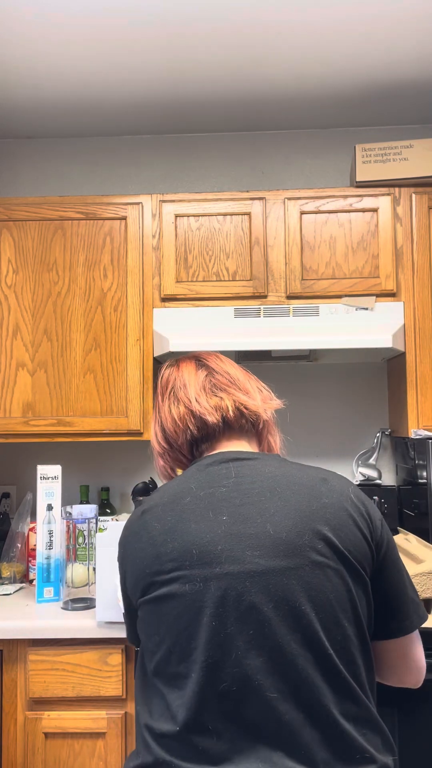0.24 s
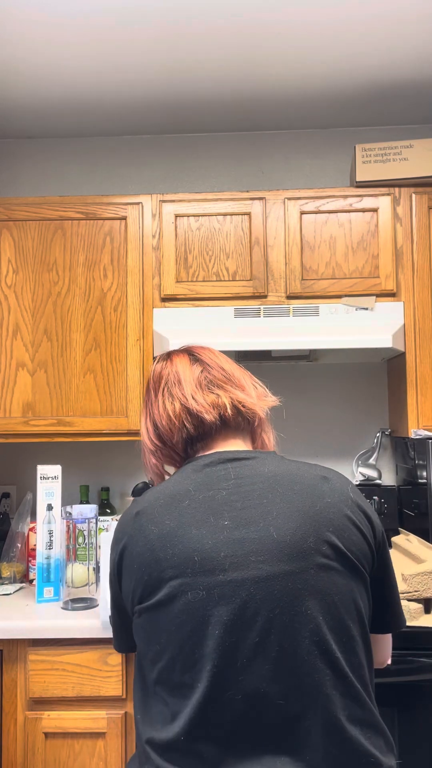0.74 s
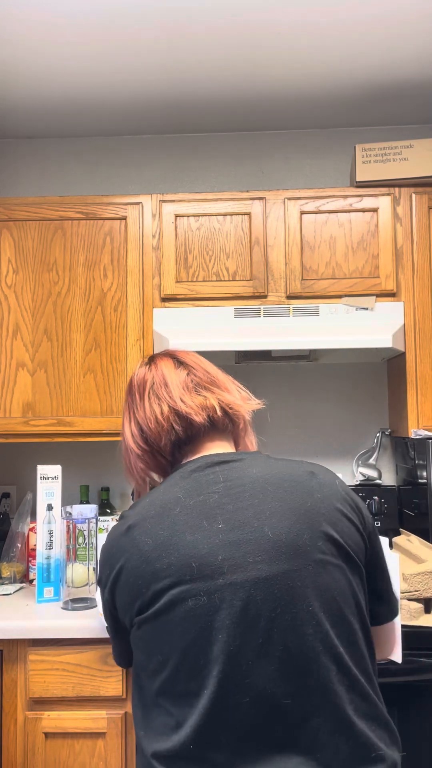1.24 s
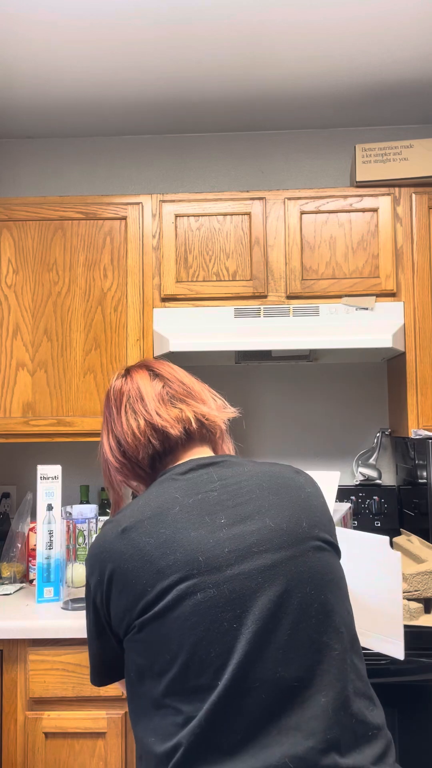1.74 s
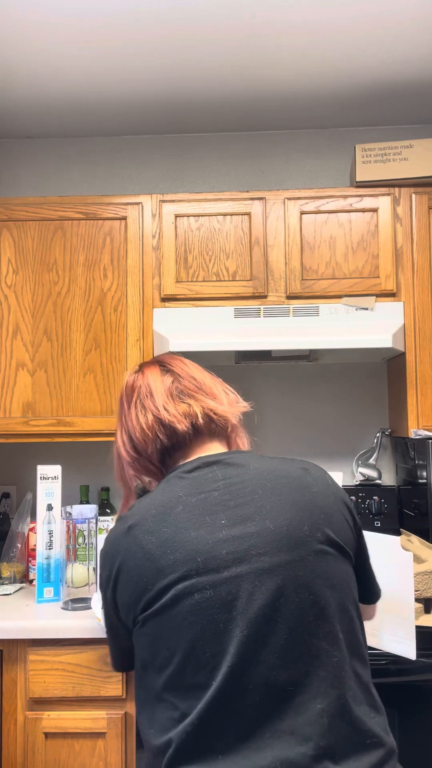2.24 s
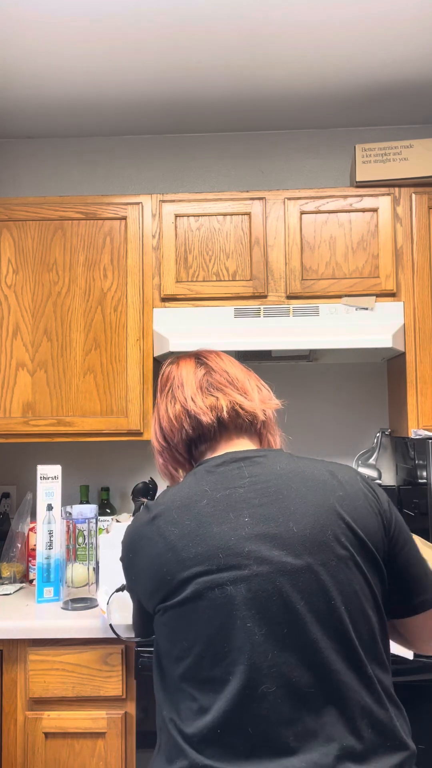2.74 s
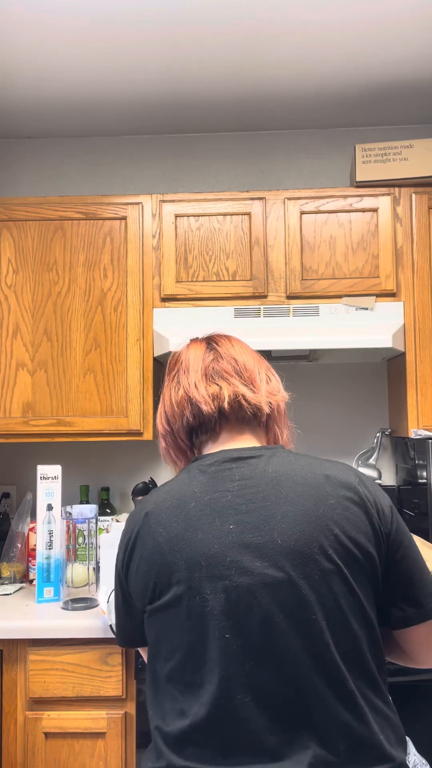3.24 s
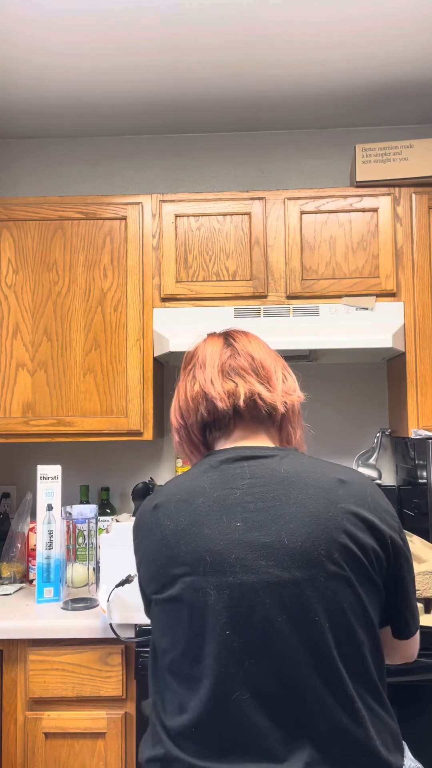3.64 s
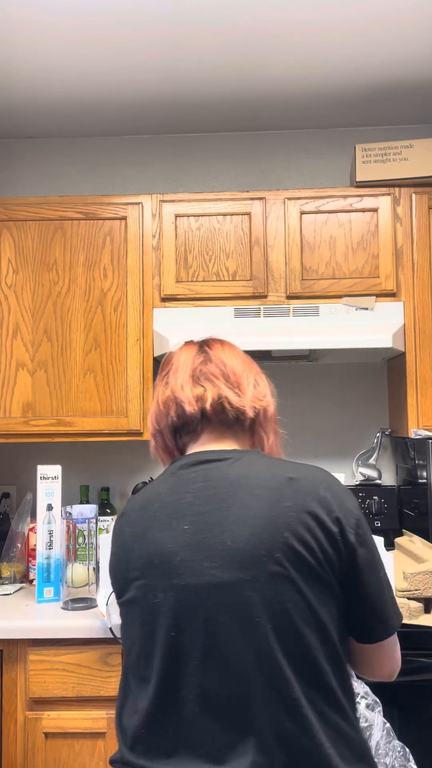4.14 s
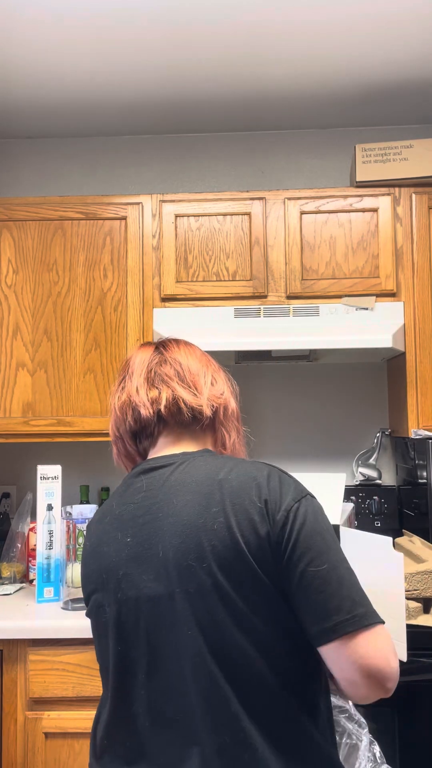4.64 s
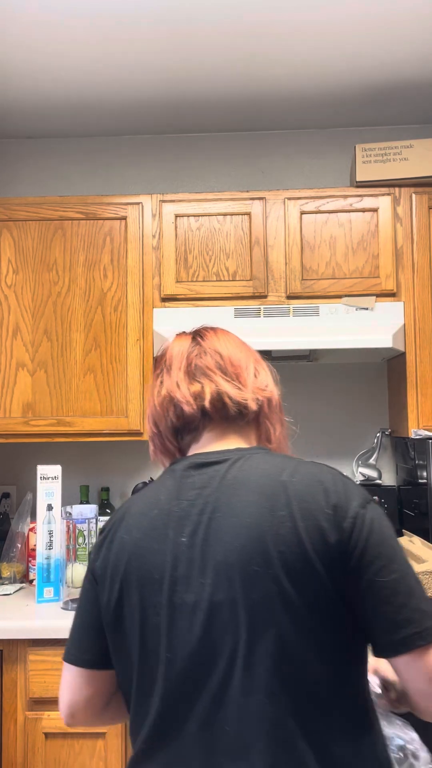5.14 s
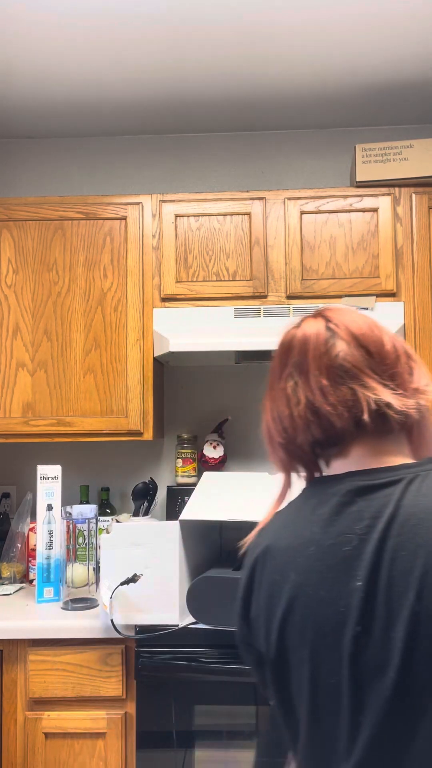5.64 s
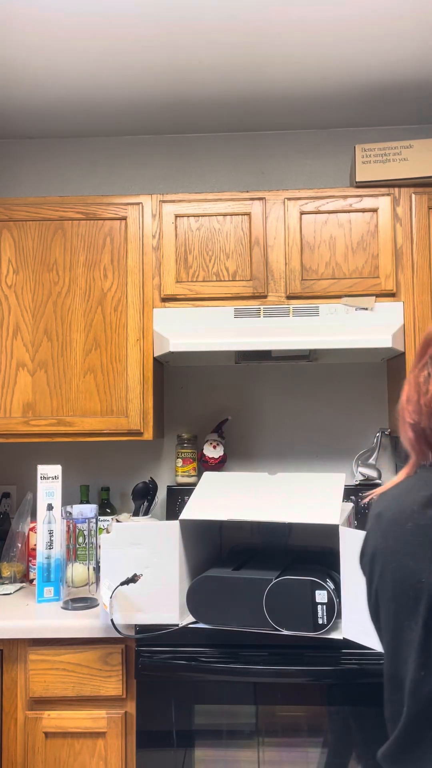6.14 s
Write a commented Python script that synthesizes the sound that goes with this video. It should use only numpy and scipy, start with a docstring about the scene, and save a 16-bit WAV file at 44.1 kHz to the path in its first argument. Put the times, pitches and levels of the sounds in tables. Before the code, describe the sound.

Large cardboard box handled on a kitchen counter: short dry scrapes, crinkly ticks, hollow knocks and soft low thuds over a faint hum.

```python
"""A large cardboard box is opened on a kitchen counter, over a quiet background and a faint hum.
Strokes of filtered stick-slip noise scrape from the start, with noise-burst ticks and flicks as creases and ridges catch.
Knocks ring the box modes, clustering near 1.5 s; the loudest ticks come around 2.4-2.6 s.
From 3.6 to 4.5 s soft sine thuds gather under the strokes; near 5.4 s the knocks cluster again.
Short rubs follow, then a faint last stroke. A phone a few steps behind hears it in stereo."""
import sys
import numpy as np
from scipy import signal
from scipy.fft import rfft, irfft, next_fast_len
from scipy.io import wavfile
from scipy.ndimage import uniform_filter1d, map_coordinates

SR = 44100
rng = np.random.default_rng(int(sys.argv[2]) if len(sys.argv) > 2 else 0)


def wrap_up_sound(samples):
    """Save the sound to the file named by the first command line argument, as 16-bit audio."""
    columns = np.atleast_2d(samples).T
    # keep every value between -1 and 1, then stretch to whole-number steps
    tamed = np.clip(columns, -1, 1)
    steps = np.round(tamed * 32767).astype(np.int16)
    wavfile.write(sys.argv[1], SR, steps)


N = 280899  # samples


def amp(db):
    """Decibels to amplitude gain."""
    return 10 ** (np.asarray(db) / 20)


def unit(x):
    """Scale to rms 1."""
    return x / np.sqrt(np.mean(x ** 2) + 1e-20)


def along(points, hz, axis=1):
    """One column of a frequency table, interpolated on a log axis."""
    table = np.transpose(points)
    return np.interp(np.log(hz + 1), np.log(table[0] + 1), table[axis])


def bell(hz, centre_hz, width_octaves):
    """Gaussian weight on an octave axis."""
    return np.exp(-.5 * (np.log2(hz / centre_hz) / width_octaves) ** 2)


def wobble(rate_hz):
    """Smooth random curve, rate_hz knots a second."""
    knots = rng.standard_normal(int(N * rate_hz / SR) + 4)
    return map_coordinates(knots, [np.arange(N) * rate_hz / SR])


def filtered(x, response):
    """Filter x by a response given as a function of frequency."""
    n = x.shape[-1]
    m = next_fast_len(n + 8192)
    return irfft(rfft(x, m) * response(np.fft.rfftfreq(m, 1 / SR)), m)[..., :n]


def add(track, start_s, sound):
    """Mix a sound into a track at start_s."""
    part = track[..., max(round(start_s * SR), 0):][..., :sound.shape[-1]]
    part += sound[..., :part.shape[-1]]


# stereo image as heard, left against right:
# (frequency [Hz], left minus right [dB], left phase lead [rad], coherence [0-1])
STEREO_IMAGE = [(60, 0, 0, 0.99), (130, 2.5, -0.2, 0.95), (240, -4.5, -0.0, 0.93), (390, -9.1, -0.2, 0.91),
                (540, -13.1, 0.9, 0.86), (780, -5.4, 2.2, 0.85), (1050, -1.3, 2.6, 0.96),
                (1500, 2.4, 2.7, 0.79), (2000, 3.8, 3.0, 0.18), (2700, 0.0, 3.5, 0.54),
                (3300, 0.3, 4.4, 0.1), (4300, 0.6, 6.3, 0.64), (5900, -0.8, 4.3, 0.34),
                (7200, 0.7, 3.1, 0.81), (10500, -0.0, 6.1, 0.86)]


def stereo(pair):
    """A shared and a diffuse signal mix into left and right with set level, phase and coherence."""
    def response(hz):
        balance_db, lead_rad, coherence = (along(STEREO_IMAGE, hz, axis) for axis in (1, 2, 3))
        turn = np.arccos(np.clip(coherence, 0, 1)) / 2
        left = amp(balance_db) * np.exp(1j * lead_rad)
        mix = np.array([[left * np.cos(turn), left * np.sin(turn)], [np.cos(turn), -np.sin(turn)]])
        return mix * np.sqrt(2 / (1 + amp(balance_db) ** 2))
    return filtered(pair, response).sum(axis=1)


# quiet background as heard, spectrum shape with a hole near 7000 Hz:
# (frequency [Hz], relative density [dB per Hz])
BACKGROUND_SPECTRUM = [(25, -5), (60, 9.5), (100, 2.5), (190, -2), (300, -3), (1000, -9), (1400, -25),
                       (3000, -25), (5000, -31), (7000, -70), (13000, -49)]


def kitchen(hum_hz=88, hum_db=-62, background_db=-58.5):
    """The quiet background is shaped noise; the hum is a sine whose phase wavers."""
    noise = rng.standard_normal((2, N))
    background = stereo(filtered(noise, lambda hz: amp(along(BACKGROUND_SPECTRUM, hz))))
    waver_rad = 1.4 * wobble(7.9)
    hum = np.sin(2 * np.pi * hum_hz * np.arange(N) / SR + waver_rad)
    return amp(background_db) * unit(background) + amp(hum_db) * hum


GRIP_S, COAST_DB_PER_S = 0.028, 111  # rise as the hand gets up to speed; fall after it stops


def gesture(length_s, db, swell_db=0):
    """Power of one hand movement: gets up to speed, swells or eases, dies away."""
    t = np.arange(int((length_s + .5) * SR)) / SR
    swell = swell_db * (np.clip(t / length_s, 0, 1) - .5)
    coast = COAST_DB_PER_S * np.maximum(t - length_s, 0)
    return amp(db + swell - coast) ** 2 * np.clip(t / GRIP_S, 0, 1)


# wide panels bent by hand: (start [s], length [s], relative level [dB])
PANEL_BENDS = [(0.465, 0.27, -52), (1.55, 1.48, -58.5), (3.617, 0.28, -51), (4.07, 0.44, -45),
               (5.267, 0.33, -50.5)]


def flexing(rasp_db, sway_db=-59, sway_db_per_rasp_db=0.27):
    """Relative panel level (dB): panels sway a little with every stroke, more when bent."""
    power = amp(sway_db + sway_db_per_rasp_db * (rasp_db - rasp_db.mean())) ** 2
    for start_s, length_s, db in PANEL_BENDS:
        add(power, start_s, gesture(length_s, db))
    return 10 * np.log10(power)


# panel sway, spectrum shape: (frequency [Hz], relative density [dB per Hz])
PANEL_SPECTRUM = [(20, -55), (35, -16), (54, 0), (90, 4), (118, -7), (150, 0), (220, -28), (400, -92)]
# soft thuds of the box on the counter: (time [s], relative level [dB], pitch [Hz])
COUNTER_THUDS = [(.681, -38, 76), (1.067, -41.5, 139), (1.401, -43, 88), (2.445, -40, 87.5),
                 (3.626, -38, 84), (3.755, -35, 54), (3.858, -27.5, 54.7), (4.045, -42, 65.6),
                 (4.114, -32, 93), (4.166, -35, 87), (4.285, -30, 100), (4.3, -34, 146), (4.405, -35, 75.4),
                 (4.47, -30, 120), (5.151, -42, 80), (5.157, -38, 148), (5.301, -37.5, 71),
                 (5.46, -33.5, 147), (5.475, -29.5, 94.5)]


def bass(flex_db, attack_s=0.0062, apart_db=-14, thud_cycles_to_60db=23):
    """Flexing panels and soft decaying thuds: long waves, nearly alike left and right."""
    noise = rng.standard_normal((2, N))
    sway, across = unit(filtered(noise, lambda hz: amp(along(PANEL_SPECTRUM, hz))))
    across = filtered(across, lambda hz: hz / 100)  # shorter waves differ more between left and right
    track = amp(flex_db - 2.0) * (sway + amp(apart_db) * np.array([across, -across]))
    t = np.arange(SR // 2) / SR
    for start_s, db, pitch_hz in COUNTER_THUDS:
        t60_s = thud_cycles_to_60db / pitch_hz
        level = amp(db - 3.0 - 60 * t / t60_s) * (1 - np.exp(-t / attack_s))
        add(track, start_s, level * np.sin(2 * np.pi * pitch_hz * t))
    return track


# creases and edges that snap: (time [s], relative level [dB], pitch [Hz])
CREASE_SNAPS = [(.347, -42, 3800), (.438, -32, 3000), (1.0311, -37, 4900), (1.076, -43, 4300),
                (1.224, -39, 4230), (1.338, -37, 4100), (1.4212, -35, 2300), (1.572, -34, 4100),
                (1.794, -33, 3000), (1.9964, -32, 4400), (2.227, -29, 4100), (2.4, -25, 2000),
                (2.413, -25.5, 1800), (2.5346, -35, 5200), (2.582, -31, 2000), (2.6025, -24, 2000),
                (2.627, -34, 1700), (2.655, -35, 2200), (2.7107, -29.5, 5000), (3.281, -41.5, 4000),
                (4.006, -40, 3500), (4.1115, -35, 2500), (4.151, -37, 3500), (4.45, -43, 1800),
                (4.6, -34, 4120), (4.883, -40, 3500), (4.948, -48, 3500), (5.008, -42, 3000),
                (5.09, -30, 3200), (5.1233, -30.5, 4300), (5.158, -28, 1500), (5.3797, -41, 4400),
                (5.453, -33, 2000), (5.5383, -37, 2000), (5.586, -25.5, 3000), (5.8854, -31, 4400),
                (6.05, -38, 3500)]


def snaps(tail_t60_s=0.11, crack_t60_s=0.0021, crack_db=7, width_octaves=0.83, lead_s=1 / 100):
    """A crease gives way with a dry tick that the room smears; a stiffer crease ticks higher."""
    track, t = np.zeros((2, N)), np.arange(SR // 5) / SR
    fade = amp(-60 * t / tail_t60_s) + amp(crack_db - 60 * t / crack_t60_s)
    for start_s, db, pitch_hz in CREASE_SNAPS:
        tick = fade * rng.standard_normal((2, len(t)))
        tick = np.pad(tick, ((0, 0), (round(lead_s * SR), 0)))  # room for the filter's pre-ring

        def colour(hz):
            return amp(along(RUB_SPECTRUM, hz) + 9.5) * bell(hz + 1, pitch_hz, width_octaves)
        add(track, start_s - lead_s, amp(db) * filtered(tick, colour))
    return stereo(track)


def scatter(t, decay_s):
    """Dense echoes off the cabinets, one set shared by left and right and one diffuse."""
    fade = amp(-30 * t / decay_s)
    spectrum = rfft(rng.standard_normal((2, len(t))) * fade ** 2)
    return irfft(spectrum / np.abs(spectrum), len(t)) * fade  # flat spectrum, then faded


# hollow box resonances: (frequency [Hz], width [Hz], relative level [dB])
BOX_MODES = [(151, 61, -2), (215.5, 16, -3), (248.5, 22.5, 4.5), (298.5, 17.5, 2), (371.4, 31, 0.5),
             (494.2, 23.7, -0.5), (531, 36, -1.5), (595.7, 24, -2), (692, 30, -1), (750, 49, -2),
             (958, 39, 7), (1047, 54, 10.5)]


def hollow(hz):
    """Response of the box's air and panel resonances."""
    return sum(amp(db) * 1j * hz * width_hz / (mode_hz ** 2 - hz ** 2 + 1j * hz * width_hz)
               for mode_hz, width_hz, db in BOX_MODES)


# hollow knocks and shoves:
# (time [s], relative level [dB], pitch [Hz], spread over modes [octaves], rise [s])
BOX_KNOCKS = [(0.456, -47, 480, .5, .003), (.586, -43, 620, 0.45, .002), (0.633, -38, 540, 0.64, 0.003),
              (0.664, -37, 680, 0.62, .003), (.683, -37, 620, 0.87, .002), (1.228, -52, 480, 0.5, .003),
              (1.444, -35.5, 640, .5, .001), (1.447, -33, 275, 0.21, .002), (1.459, -32, 275, .25, .0022),
              (1.471, -38, 850, .5, .001), (1.482, -41, 340, .4, .002), (1.531, -36, 900, .35, .002),
              (1.707, -39.5, 393, 0.25, 0.0019), (1.83, -45, 500, 0.68, .003),
              (2.126, -45, 480, 0.41, .0024), (2.397, -32.5, 700, 0.36, 0.0018),
              (2.409, -37, 600, .55, .0006), (2.585, -42, 606, 0.57, .001), (2.606, -38, 520, .6, .005),
              (2.626, -39.5, 600, 0.37, 0.0018), (2.903, -39, 1080, 0.089, 0.011),
              (3.614, -44, 450, 0.58, 0.0053), (3.645, -43.5, 250, 0.26, 0.0032),
              (3.715, -43, 480, 0.41, 0.014), (3.865, -38, 480, 0.44, 0.0087), (3.9, -41.5, 536, .4, .0039),
              (3.985, -47, 590, 0.65, .002), (4.121, -41.5, 500, .5, 0.0065), (4.165, -46, 500, 0.4, .0033),
              (4.261, -40, 330, 0.75, 0.0058), (4.308, -31.5, 640, 0.6, 0.0064),
              (4.345, -40, 700, .5, .0051), (4.425, -38, 507, 0.57, 0.0034),
              (4.454, -38, 540, 0.44, 0.0021), (4.83, -51, 400, 0.42, .005),
              (5.156, -31.5, 527, 0.65, 0.0034), (5.405, -35, 640, .45, 0.00087),
              (5.418, -29.5, 560, .25, 0.0017), (5.429, -33.5, 345, 0.17, .002),
              (5.435, -34, 477, .25, .0012), (5.455, -34.5, 305, 0.13, .0015),
              (5.461, -38, 600, 0.6, 0.0022), (5.58, -35.5, 620, 0.76, .0039), (5.743, -45, 686, .5, .002),
              (5.928, -41, 620, 0.39, 0.0037)]


def knocks(wet=0.48, drift_db=0.5, early_s=0.023, soft_hz=2200, decay_s=0.14, decay_per_rise=25):
    """Each soft-edged blow rings the box around its own pitch, and the cabinets scatter it."""
    track, t = np.zeros((2, N)), np.arange(SR // 3) / SR
    modes = np.array([np.sin(2 * np.pi * hz * t) * np.exp(-np.pi * width_hz * t)
                      for hz, width_hz, _ in BOX_MODES])
    mode_hz, _, mode_db = np.transpose(BOX_MODES)
    for start_s, db, pitch_hz, spread_octaves, rise_s in BOX_KNOCKS:
        share = bell(mode_hz, pitch_hz, spread_octaves)
        drift = drift_db * rng.standard_normal(len(BOX_MODES))
        ring = (share * amp(mode_db + drift)) @ modes
        echoes = scatter(t, decay_s + decay_per_rise * rise_s)  # a shove lasts longer
        tail = signal.fftconvolve(ring[None], echoes, axes=1)[:, :len(t)]
        blow = unit(ring) * np.array([[1], [0]]) + wet * unit(tail)
        blow *= 1 - np.exp(-t / rise_s)  # a shove builds slowly, a knock at once
        early_rms = np.std(blow[0, t < early_s + rise_s])
        add(track, start_s, amp(db - 3.5) * blow / early_rms)
    return stereo(filtered(track, lambda hz: 1 / (1 + (hz / soft_hz) ** 4)))


def crinkles(hiss_db, rate_hz=22, level_db=-16.5, spread_db=6, t60_s=0.062,
             width_octaves=0.43, settle_db=-62):
    """Ridges flick past each other, each with its own pitch; faint ones go on as the board settles."""
    track, t = np.zeros((2, N)), np.arange(SR // 12) / SR
    for when, pitch, size in rng.random((int(rate_hz * N / SR), 3)):
        centre_hz = 1300 * 4 ** pitch
        burst = amp(-60 * t / t60_s) * rng.standard_normal((2, len(t)))
        flick = filtered(burst, lambda hz: bell(hz + 1, centre_hz, width_octaves))
        slide_db = max(hiss_db[int(when * N)], settle_db)
        add(track, when * N / SR, amp(slide_db + level_db + spread_db * size) * unit(flick))
    return stereo(filtered(track, lambda hz: 1 / (1 + (hz / 6200) ** 16)))


# strokes of cardboard along cardboard: (start [s], length [s], relative fibre hiss level [dB],
# swell from start to end [dB], pressure as rasp over hiss [dB])
BOARD_STROKES = [(0.0, 0.23, -55, -8.5, -3.5), (0.231, 0.23, -53.5, -1, -3), (0.404, 0.072, -46.5, 3, -2),
                 (0.506, 0.17, -49, 5.5, 0.5), (0.755, 0.065, -50.5, 1, -2.5),
                 (0.839, 0.068, -55, -2.5, 1.5), (0.93, 0.082, -61.5, -3, -3),
                 (1.007, 0.1, -61.5, -1, -2.5), (1.167, .03, -61.5, 2, 1), (1.206, 0.17, -51, 3, -3.5),
                 (1.397, 0.2, -48.5, 3.5, 0), (1.656, 0.1, -49.5, 3.5, 0), (1.787, 0.07, -49, 3.5, -4.5),
                 (1.894, 0.12, -50, 4, -2), (2.05, 0.11, -49, 2.5, -2), (2.19, 0.071, -45.5, -6, -5),
                 (2.295, 0.091, -46, 3.5, -1.5), (2.47, 0.15, -52, 8.5, 2), (2.581, 0.066, -43.5, 0, -2.5),
                 (2.682, 0.089, -53, -1.5, 2), (2.781, 0.086, -54.5, 0.5, -3.5),
                 (2.863, 0.066, -53.5, -2.5, 1.5), (3.005, 0.08, -56, 4, -2.5),
                 (3.131, 0.071, -55, -0.5, -4.5), (3.29, 0.041, -58.5, 0.5, -5.5),
                 (3.562, 0.17, -56.5, 11.5, 1.5), (3.818, 0.22, -51.5, -3.5, 1),
                 (4.079, 0.26, -52, -6, 0.5), (4.231, .23, -47.5, -0.5, -0.5), (4.49, 0.12, -54, 7.5, -3),
                 (4.623, 0.28, -57, -9, -1), (4.917, 0.08, -61.5, -4, 2.5), (4.997, 0.17, -47.5, 7, -0.5),
                 (5.2, 0.22, -53.5, 1, -1), (5.381, .11, -49.5, 0.5, 1), (5.538, 0.045, -45.5, 4, 2),
                 (5.66, 0.063, -56.5, -3, 1.5), (5.726, 0.064, -51.5, -1.5, -1.5),
                 (5.804, 0.063, -54, 3, 2), (5.87, 0.063, -47.5, 4, -0.5), (5.998, 0.055, -55, -2.5, 3),
                 (6.115, 0.34, -58, -2, 0.5)]


def sliding(rest_db=-72):
    """Relative levels (dB) of fibre hiss and board rasp over all strokes."""
    hiss, rasp = np.full((2, N), amp(rest_db) ** 2)
    for start_s, length_s, db, swell_db, press_db in BOARD_STROKES:
        power = gesture(length_s, db, swell_db)
        add(hiss, start_s, power)
        add(rasp, start_s, power * amp(press_db) ** 2)
    return 10 * np.log10(hiss), 10 * np.log10(rasp)


def slips(rate_hz, spread_db, smooth):
    """Tiny stick-slip releases of uneven size, on the wash of their own echoes."""
    sizes = amp(spread_db * rng.standard_normal((2, N))) * rng.choice([-1, 1], (2, N))
    releases = (rng.random((2, N)) < rate_hz / SR) * sizes
    return unit(releases) + smooth * rng.standard_normal((2, N))


def smoothed_noise(shape, bins, frames):
    """Noise over a spectrogram, averaged across bins and frames, at rms 1."""
    noise = uniform_filter1d(rng.standard_normal(shape), size=bins, axis=0)
    return unit(uniform_filter1d(noise, size=frames, axis=1))


def patchy(x, depth_db, ripple_db=2.5):
    """Wandering contact gives broad patches of colour; nearby reflections give a fine ripple."""
    z = signal.stft(x, nperseg=2048)[2]
    broad = smoothed_noise(z.shape[1:], bins=14, frames=3)
    fine = smoothed_noise(z.shape[1:], bins=2, frames=9)
    return signal.istft(z * amp(depth_db * broad + ripple_db * fine), nperseg=2048)[1][:, :N]


# rubbing as heard, spectrum shape with a hole near 7200 Hz:
# (frequency [Hz], relative density [dB per Hz])
RUB_SPECTRUM = [(150, -13), (280, -3.5), (600, -1.5), (860, -2), (1040, -1.5), (1220, -8), (2000, -11),
                (3000, -17.5), (4200, -14.5), (5300, -17), (6100, -20.5), (6700, -25), (7200, -86),
                (8800, -39), (10000, -37.5), (13000, -53)]


def rubbed(force, colour):
    """A rubbing force, coloured and spread to left and right; their mean has rms 1."""
    contact = patchy(force, depth_db=1.5)
    sound = stereo(filtered(contact, lambda hz: amp(along(RUB_SPECTRUM, hz)) * colour(hz)))
    return sound / np.std(sound.mean(axis=0))


def scrape(hiss_db, rasp_db, flex_db, split_hz=2300, ring=0.44, boom_db=-4):
    """Sliding makes the fibres hiss; pressure makes the board rasp, and bent panels make the box boom."""
    judder = wobble(55)  # the edge sticks and lets go

    def low(hz):
        return 1 / np.sqrt(1 + (hz / split_hz) ** 6)

    def board(hz):
        return low(hz) * (1 + ring * np.abs(hollow(hz))) * hz ** 2 / (hz ** 2 + 280 ** 2)

    def fibres(hz):
        return np.sqrt(1 - low(hz) ** 2)

    def cavity(hz):
        return hollow(hz) / (1 + (hz / 600) ** 2)

    rasp = rubbed(slips(rate_hz=600, spread_db=1.5, smooth=1.0), board)
    hiss = rubbed(slips(rate_hz=1300, spread_db=0.5, smooth=1.0), fibres)
    boom = rubbed(slips(rate_hz=230, spread_db=1.5, smooth=0.98), cavity)
    return (rasp * amp(rasp_db + 1.5 + 0.72 * judder)
            + hiss * amp(hiss_db + .5 * judder + 0.12 * wobble(130))
            + boom * amp((flex_db + rasp_db) / 2 + boom_db))


def scene():
    """Strokes drive the scraping, crinkling and panels; knocks, snaps, thuds and background join them."""
    hiss_db, rasp_db = sliding()
    flex_db = flexing(rasp_db)
    background = kitchen() + bass(flex_db)
    events = snaps() + knocks()
    return background + events + crinkles(hiss_db) + scrape(hiss_db, rasp_db, flex_db)


# narrow peaks and dips of the phone's pickup: (frequency [Hz], width [Hz], mid gain [dB], side gain [dB])
PHONE_PEAKS = [(1000, 22, 2.5, 1), (1090, 45, -3, -.5), (1185, 25, -2, -2.5), (1275, 55, 3.5, 2.5),
               (1385, 45, 0, 2.5), (1570, 50, 3.5, 2), (1780, 100, -2, .5), (1965, 40, 3.5, -1),
               (2100, 50, -1.5, 0), (2830, 130, -2.5, 0), (3080, 100, 1, -3), (3730, 200, -2.5, 0),
               (4170, 170, 0, -1.5), (5650, 170, -2, 0)]


def pickup(x):
    """Sum and difference of left and right each have their own narrow peaks and dips."""
    def response(hz):
        return amp(sum(np.outer([mid_db, side_db], np.exp(-.5 * ((hz - centre_hz) / width_hz) ** 2))
                       for centre_hz, width_hz, mid_db, side_db in PHONE_PEAKS))
    mid, side = filtered(np.array([x[0] + x[1], x[0] - x[1]]) / 2, response)
    return np.array([mid + side, mid - side])


def record(dry, top_hz=13200):
    """The phone colours the sound and keeps nothing above its band limit."""
    return filtered(pickup(dry), lambda hz: hz < top_hz)


dry = scene()
out = record(dry)
wrap_up_sound(out)
```